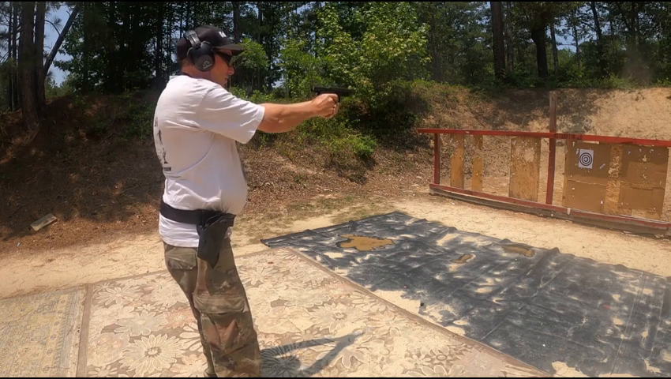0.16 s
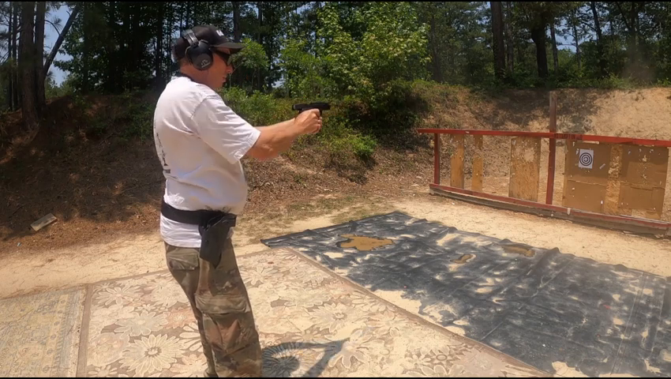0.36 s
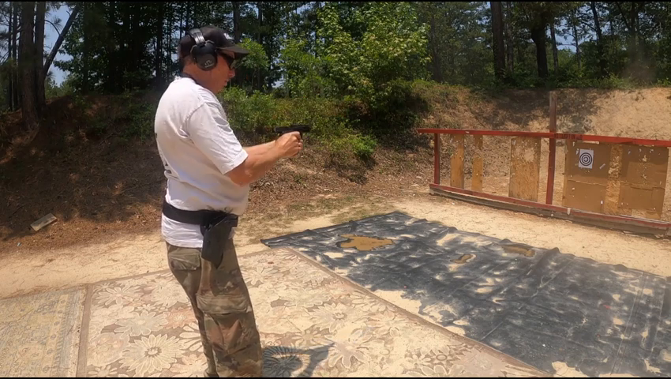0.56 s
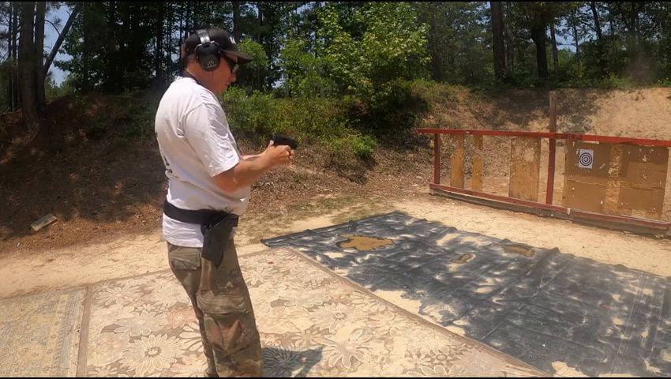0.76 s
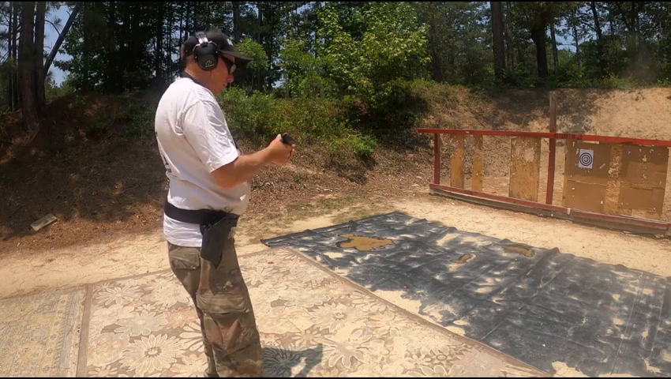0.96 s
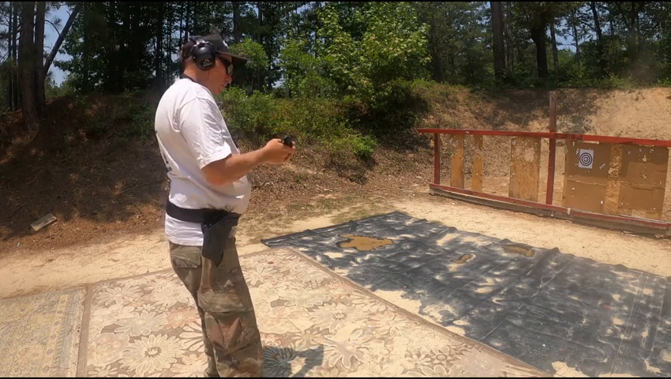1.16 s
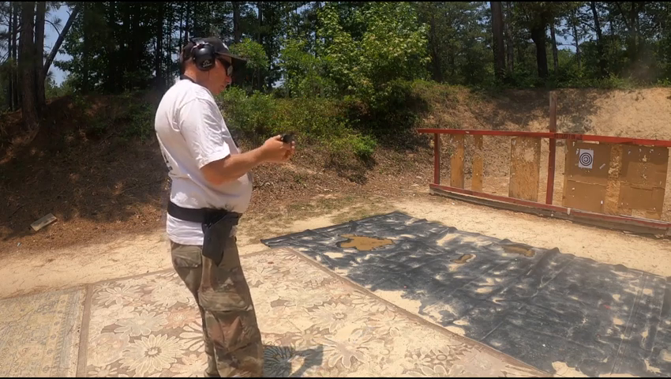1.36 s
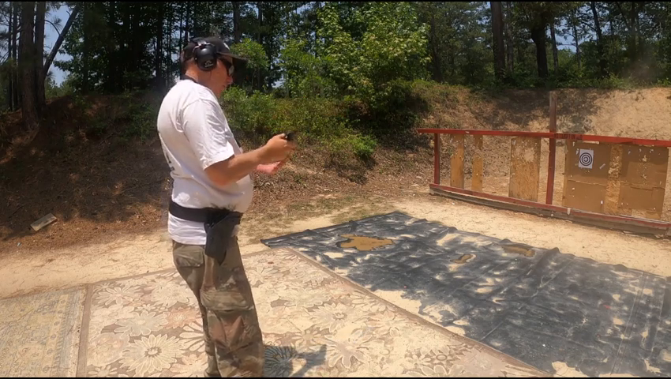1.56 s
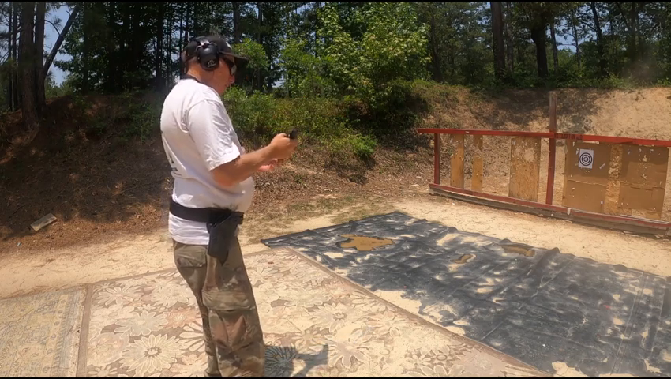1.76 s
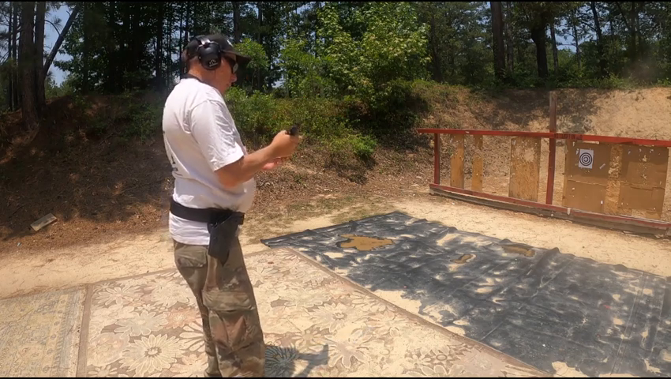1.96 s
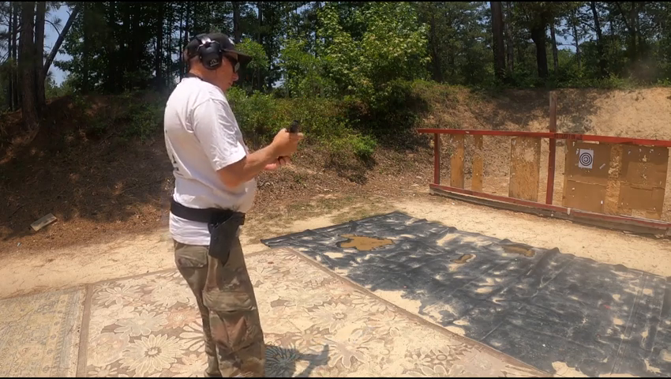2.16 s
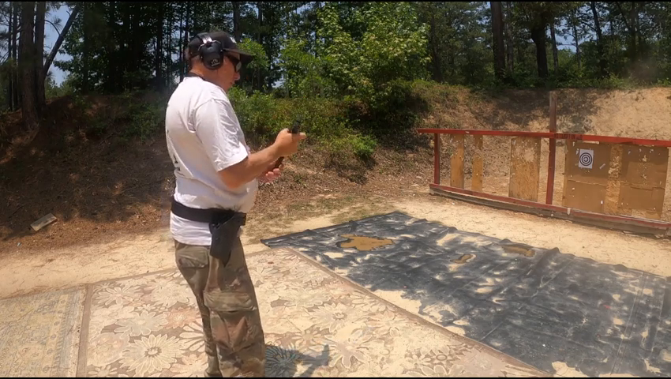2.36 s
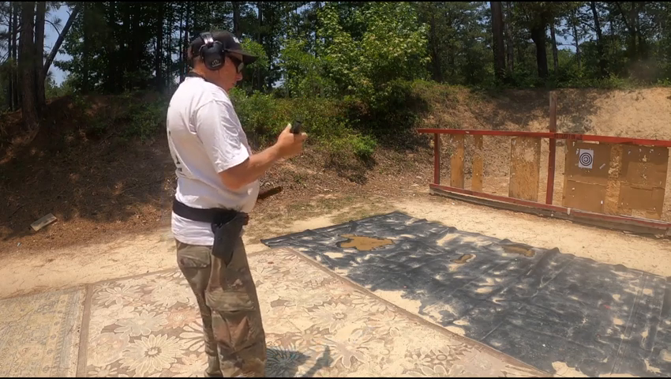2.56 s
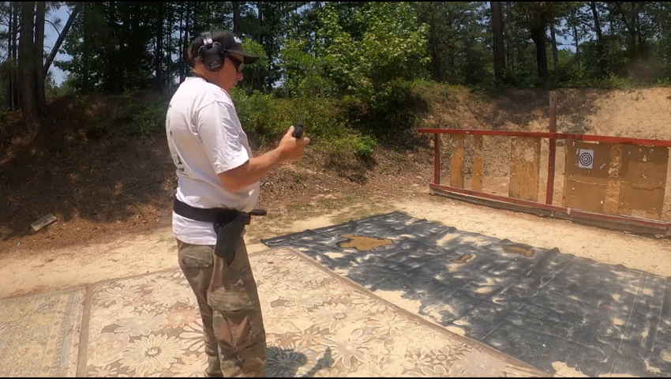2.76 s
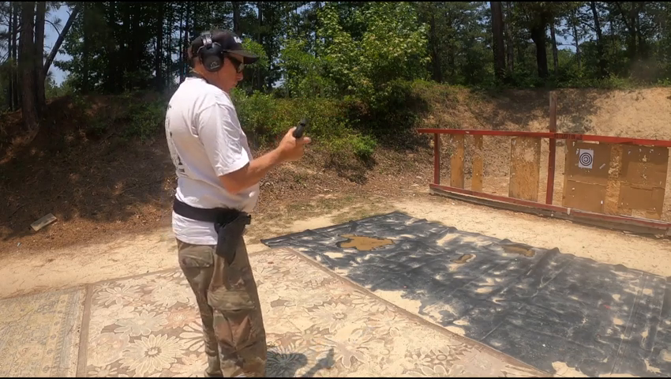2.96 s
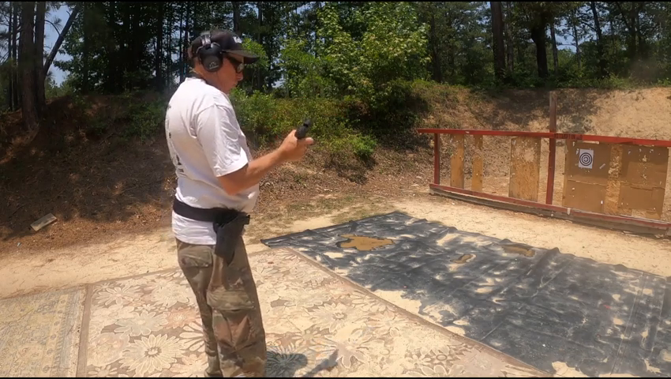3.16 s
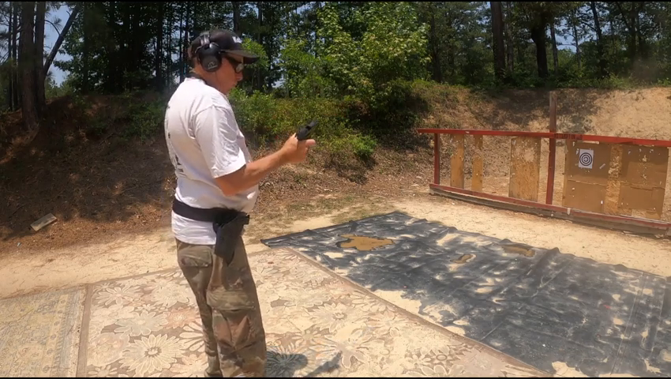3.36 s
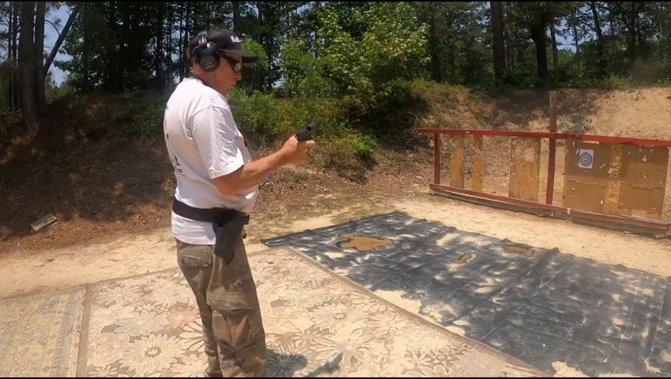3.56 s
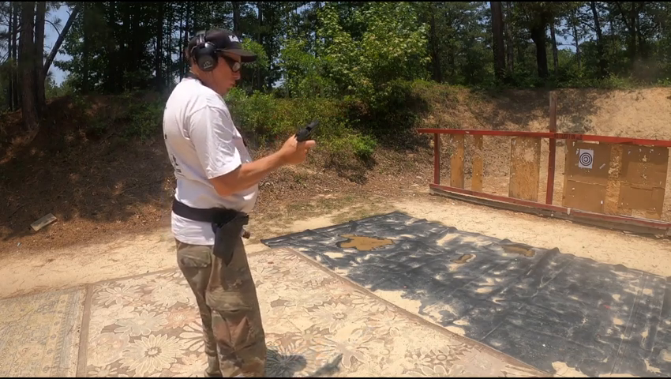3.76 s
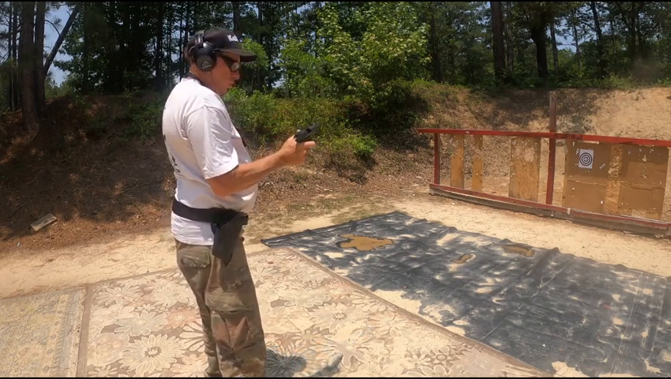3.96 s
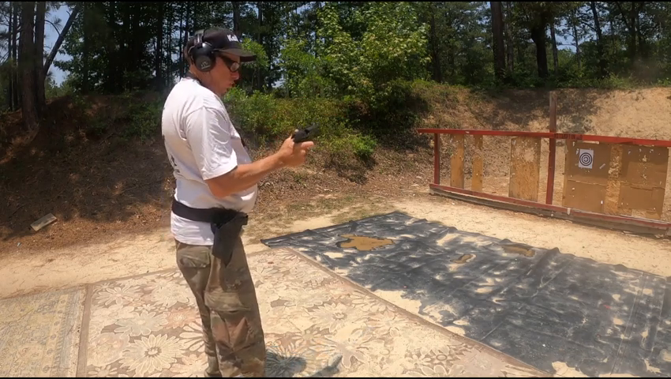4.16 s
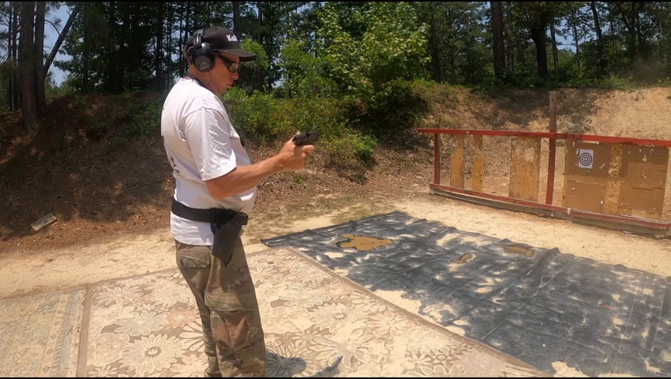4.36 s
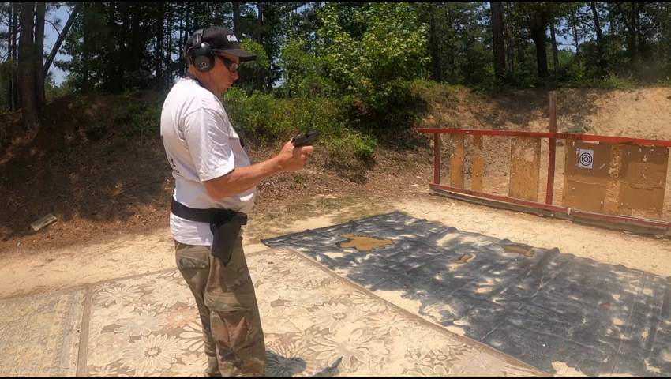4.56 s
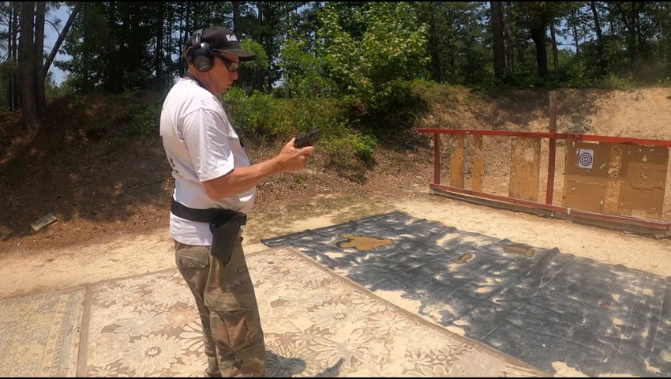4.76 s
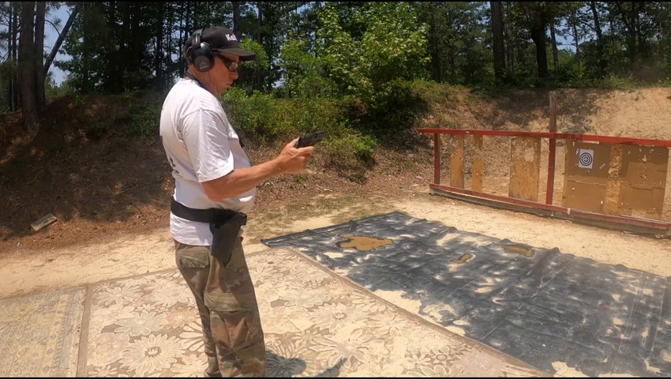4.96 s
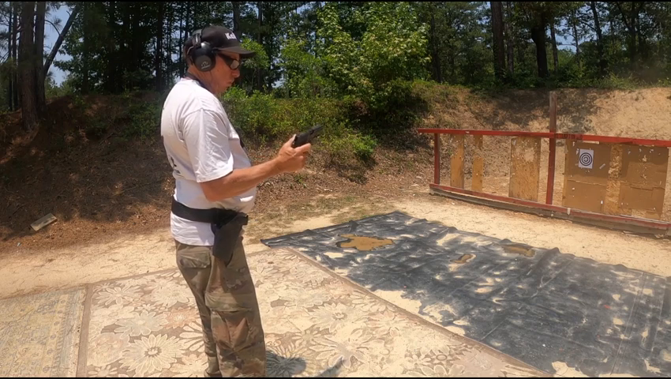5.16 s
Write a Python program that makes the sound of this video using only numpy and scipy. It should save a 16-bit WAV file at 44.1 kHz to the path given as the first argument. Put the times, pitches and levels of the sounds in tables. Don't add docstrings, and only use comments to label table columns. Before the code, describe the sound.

A pistol shot's echo rolls away across a wooded outdoor range, then light steel clicks, a sliding magazine and a loud metallic slide snap.

```python
import sys
import numpy as np
from scipy import signal
from scipy.io import wavfile

SR = 44100
rng = np.random.default_rng(int(sys.argv[2]) if len(sys.argv) > 2 else 0)


def generate_wav(sig):
    pcm = np.round(np.clip(np.atleast_2d(sig).T, -1, 1) * 32767).astype(np.int16)
    wavfile.write(sys.argv[1], SR, pcm)


def magnitude_from_level(level_db):
    exponent = np.asarray(level_db, float) / 20
    return 10 ** exponent


N = 229981


def at_hz(points, hz):
    f, level = np.array(points)[:, 0], np.array(points)[:, 1]
    return np.interp(np.log(hz), np.log(f), level)


def rms_one(x):
    return x / np.sqrt(np.mean(x ** 2) + 1e-20)


def band_pass(x, edges, order):
    return signal.sosfilt(signal.butter(order, edges, "band", fs=SR, output="sos"), x)


def drift(rate):
    r = np.exp(-80 * np.pi * rate / SR)
    slow = signal.lfilter([1], [1, -2 * r, r * r], rng.standard_normal(N // 40 + 2002))[2000:]
    return np.interp(np.arange(N) / 40, np.arange(len(slow)), rms_one(slow))


def ring(clicks, hz, t60):
    r, w = magnitude_from_level(-60 / (t60 * SR)), 2 * np.pi * hz / SR
    return signal.lfilter([0, np.sin(w)], [1, -2 * r * np.cos(w), r * r], clicks + 1e-18)


def swell(rows, t):
    total = 0
    for start, attack, hold, db, fall in rows:
        climb_db = 15 * np.clip(1 - (t - start) / attack, 0, 1)
        fallen_db = fall * np.clip(t - start - attack - hold, 0, 9)
        total = total + (t > start) * magnitude_from_level(db - climb_db - fallen_db)
    return total


# f/Hz, side minus mid level/dB
AIR_WIDTH = [(30, -24), (240, -36), (950, -42), (3770, -26), (15000, -8)]


def noise_bands():
    edges = 22 * 2 ** np.arange(0, 9.7, 1 / 3)
    centres = np.sqrt(edges[1:] * edges[:-1])
    white, bands = rng.standard_normal((2, 2, N)), []
    for k, hz in enumerate(centres):
        mid, side = band_pass(white[k % 2], edges[k:k + 2], 3)
        bands.append(mid + magnitude_from_level(at_hz(AIR_WIDTH, hz)) * side * [[1], [-1]])
    return centres, bands


def coloured(bank, spectrum, patchy_db):
    return rms_one(sum(magnitude_from_level(at_hz(spectrum, hz) + patchy_db * drift(7)) * band for hz, band in zip(*bank)))


# f/Hz, level/dB per Hz
ROLL_SPECTRUM = [(25, -53), (100, -16.5), (250, -16), (500, -5), (900, -3.5), (1300, -5), (1800, -15),
                 (2800, -10), (5000, -17.5), (9000, -27.5), (15000, -54)]
# f/Hz, loss/dB per s
AIR_LOSS_RATE = [(30, 42.5), (100, 21), (250, -8.5), (700, 5), (2400, 22), (4000, 47.5), (6000, 62.5),
                 (10000, 107.5), (15000, 153)]


def shot_roll(bank):
    age, together = np.arange(N) / SR, drift(13)
    near_db = -29.5 - 83.5 * np.clip(age - 0.15, 0, 9)
    woods_db = -34 - 13 * age - 25 * np.clip(age - 2.3, 0, 9)
    gains = magnitude_from_level(at_hz(ROLL_SPECTRUM, bank[0]))
    gains = gains / np.sqrt(np.sum(gains ** 2 * bank[0]) / SR)
    roll = 0
    for gain, hz, band in zip(gains, *bank):
        loss = at_hz(AIR_LOSS_RATE, hz)
        near = magnitude_from_level(near_db - loss * 0.76 * age)
        woods = magnitude_from_level(woods_db - loss * 0.63 * (age + 0.09))
        flicker = magnitude_from_level(0.4 * together + 0.6 * drift(11))
        roll = roll + gain * np.hypot(near, woods) * flicker * band
    return magnitude_from_level(3.0) * roll


# t/s, peak level/dB, length/ms
BANK_SLAPS = [
    (.008, -17.5, 4.5),
    (0.014, -15, 0.88),
    (0.055, -20, 2.13),
    (0.058, -12, 3.5),
    (0.107, -18, 3.1),
    (0.131, -28, 2.6),
]


def slaps():
    out = np.zeros(N)
    for s, db, ms in BANK_SLAPS:
        i, n = round(s * SR), round(ms * SR / 1000)
        out[i:i + n] += magnitude_from_level(db) * np.linspace(1, -1, n)
    return band_pass(out, [220, 1900], 2)


# start t/s, attack/s, hold/s, level/dB, fall/dB per s
OPENING_BASS = [
    (-.01, 0.0067, 0.0012, -30.5, 671),
    (.06, 0.031, .002, -48, 337),
    (.15, 0.043, .002, -52, 805),
    (.2, 0.022, 0.22, -74.5, 58),
]


def opening_bass():
    low = band_pass(rng.standard_normal(N + SR), [18, 90], 2)[SR:]
    return swell(OPENING_BASS, np.arange(N) / SR) * rms_one(low)


# f/Hz, level/dB per Hz
RUMBLE_SPECTRUM = [(20, -13), (45, -12), (80, -6), (120, -7), (180, -2), (260, -14), (400, -19), (700, -24),
                   (1200, -34), (4000, -80)]
# f/Hz, level/dB per Hz
LEAF_SPECTRUM = [(250, -16), (600, -20), (1000, -15.5), (1500, -0.5), (2200, 0), (3200, -3.5), (5000, -8),
                 (7500, -10), (9500, -21.5), (11500, -24), (15500, -39)]


def surroundings(bank):
    t = np.arange(N) / SR
    rumble_db = -61 - 6 * np.clip(3.0 - t, 0, 9) - 30.5 * np.clip(1 - t, 0, 1)
    dip_db = 12 * np.clip(1 - abs(t - 2.76) / 0.12, 0, 1)
    hiss_db = -75 - 17.5 * np.clip(2.08 - t, 0, 9) - dip_db
    lumps_db = 0.73 * drift(1.9) + 0.48 * drift(9.9)
    rumble = magnitude_from_level(rumble_db + lumps_db) * coloured(bank, RUMBLE_SPECTRUM, patchy_db=2.0)
    return rumble + magnitude_from_level(hiss_db) * coloured(bank, LEAF_SPECTRUM, patchy_db=-0.16)


# f/Hz, level/dB, t60/s
STEEL_MODES = [(750, -6, .005), (1270, -3, .006), (1700, -2, .004), (2250, -2, .005), (2700, -3, .004),
               (3350, -3, .008), (3900, -4, .005), (4450, -1, .006), (5000, -3, .006), (5600, -5, .005),
               (6700, -6, .004), (7600, -2, .006), (9050, -6, .005), (10200, -11, .003), (11600, -13, .003),
               (13200, -16, .002), (14800, -19, .002)]


def contacts(table, octaves, t60_scale, dry_db, blow, order):
    out, t = np.zeros(N), np.arange(SR // 12) / SR
    for s, db, hz, ms in table:
        age = t * 1000 / max(ms, .1)
        rattle = rng.standard_normal(len(t)) * np.minimum(age * 3, 1) * np.exp(-age)
        rattle[round(ms * 8)] = blow
        rings = 0
        for k, (mode_hz, mode_db, t60) in enumerate(STEEL_MODES):
            level_chance, pitch_chance = rng.standard_normal(2)
            mode = ring(rattle, mode_hz * (1 + 0.0029 * pitch_chance), t60 * t60_scale)
            rings = rings + (-1) ** k * magnitude_from_level(mode_db + 3 * level_chance) * mode
        edges = np.clip(hz * 2. ** np.array([-octaves / 2, octaves / 2]), 300, 19000)
        hit = band_pass(rms_one(rings) + magnitude_from_level(dry_db) * rms_one(rattle), edges, order)
        i = round(s * SR)
        out[i:i + len(t)] += magnitude_from_level(db) * hit / np.abs(hit).max()
    return out


# t/s, peak level/dB, centre f/Hz, rattle/ms
PIN_TICKS = [
    (1.572, -81, 9730, 2.1),
    (1.628, -80, 10000, 5.),
    (1.651, -63, 5500, 1.5),
    (3.29, -72, 9760, 8.),
    (4.094, -50, 4700, 4.),
    (4.105, -63, 4800, 12),
    (4.121, -65, 4600, 9.2),
    (4.14, -70, 4570, 11.),
]


def pins():
    return contacts(PIN_TICKS, octaves=.18, t60_scale=0.5, dry_db=5, blow=2.3, order=3)


# delay t/s, attack/s, hold/s, level/dB, fall/dB per s
YARD_ECHO = [
    (.001, 0.003, 0.0024, -70, 261),
    (.03, .03, .005, -52, 101),
             (.027, .003, .002, -40, 3500),
]


def yard(x):
    t = np.arange(round(.4 * SR)) / SR
    echo = rng.standard_normal(len(t)) * swell(YARD_ECHO, t)
    echo = band_pass(echo, [1000, 12000], 1)
    stretch = np.minimum(t // .016, 13)
    out = 0
    for k in range(14):
        side_facing = x * np.sign(drift(600))
        out = out + signal.fftconvolve(side_facing, echo * (stretch == k))[:N]
    return out


# start t/s, length/s, from f/Hz, to f/Hz, level/dB
BIRD_NOTES = [(1.62, .04, 3350, 3380, -83), (1.635, .075, 3000, 2880, -74), (1.70, .11, 3000, 3150, -75),
              (1.74, .08, 2700, 2550, -77), (1.80, .06, 2650, 3500, -76), (1.86, .14, 3200, 3050, -77),
              (1.85, .2, 3600, 3480, -75), (1.825, .04, 6800, 4800, -81), (2.025, .045, 4750, 5350, -79),
              (2.075, .043, 7300, 4550, -72), (2.075, .055, 6000, 5750, -80)]


def bird():
    out, t = np.zeros(N), np.arange(N) / SR
    rough = np.clip(.1 + 2.95 * (t - 1.62), 0, .7)
    for s, length, from_hz, to_hz, db in BIRD_NOTES:
        along = np.clip((t - s) / length, 0, 1)
        level_db = db + np.interp(along, [0, .35, 1], [-6, 0, -5])
        edge = np.clip(np.minimum(t - s, s + length - t) / 0.0044, 0, 1)
        glide_hz = from_hz + (to_hz - from_hz) * along
        phase = 2 * np.pi * np.cumsum(glide_hz * (1 + 0.0275 * rough * drift(180.0))) / SR
        flutter = 1 - 0.71 * rough + rough * drift(200)
        out += edge * magnitude_from_level(level_db + 8) * flutter * np.sin(phase)
    echo_t = np.arange(SR // 3) / SR
    trees = rng.standard_normal(SR // 3) * magnitude_from_level(-35 - 110 * echo_t)
    return out + signal.fftconvolve(out, trees)[:N]


# f/Hz, level/dB per Hz
SLOPE_SPECTRUM = [(500, -23), (800, -2), (1200, 7.5), (1700, -3.5), (2400, -3), (3400, -14.5), (5000, -30),
                  (8000, -37)]
# start t/s, attack/s, hold/s, level/dB, fall/dB per s
SLOPE_RETURN = [
    (1.75, 0.088, 0.56, -74, 36),
    (2.76, 0.16, 0.078, -60.5, 26.5),
    (2.9, 0.22, 0.2, -72, 5),
]


def far_slope(bank):
    noise = coloured(bank, SLOPE_SPECTRUM, patchy_db=3.0)
    return swell(SLOPE_RETURN, np.arange(N) / SR) * np.roll(noise, SR, axis=1)


def scrape(strokes, modes, rasp_db):
    sizes_db = 2.2 * np.minimum(rng.exponential(1, N), 3) + .8 * drift(90)
    slips = magnitude_from_level(sizes_db) * rng.choice([-1, 1], N)
    slips = slips * (rng.random(N) < 9000 / SR)
    rings = 0
    for k, (hz, width, db) in enumerate(modes):
        rings = rings + (-1) ** k * magnitude_from_level(db) * rms_one(ring(slips, hz, 2.2 / width))
    rasp = band_pass(slips, [1200, 7000], 2)
    sound = rms_one(rms_one(rings) + magnitude_from_level(rasp_db) * rms_one(rasp))
    return swell(strokes, np.arange(N) / SR) * sound


# t/s, peak level/dB, centre f/Hz, rattle/ms
MAGAZINE_CLICKS = [(2.2925, -48, 2200, 1), (2.296, -40, 930, 1.04), (2.2995, -37.5, 4200, 3.1),
                   (2.3098, -31, 5400, 3.2), (2.330, -49, 3100, 2.5), (2.344, -28, 2040, 0.4),
                   (2.3465, -36, 1890, 3.4), (2.357, -56, 2500, 1.7), (2.3755, -37.5, 1900, 3.7),
                   (2.449, -46.5, 1890, 2.58), (2.5125, -40, 4000, 3.9), (2.641, -41, 3020, 3.4),
                   (2.6595, -32.5, 2020, 1.3), (2.6655, -42.5, 1330, 3.4)]
# start t/s, attack/s, hold/s, level/dB, fall/dB per s
MAGAZINE_STROKES = [
    (2.29, 0.011, 0.014, -47.5, 208),
    (2.33, 0.0092, 0.016, -71, 274),
    (2.508, 0.038, 0.021, -45, 213),
    (2.585, 0.013, 0.0035, -50, 330),
    (2.63, 0.011, 0.026, -56, 450),
]
# f/Hz, width/Hz, level/dB
WELL_MODES = [(1280, 120, -9), (1900, 300, -10), (2350, 260, -1), (2850, 260, -6), (3340, 70, -1),
              (4300, 200, -6), (5750, 250, -11), (7600, 250, -16), (9000, 400, -22)]


def magazine():
    clicks = contacts(MAGAZINE_CLICKS, octaves=1.3, t60_scale=0.73, dry_db=1.6, blow=4.1, order=2)
    return clicks + magnitude_from_level(1.5) * scrape(MAGAZINE_STROKES, WELL_MODES, rasp_db=-9.0)


# t/s, peak level/dB, centre f/Hz, rattle/ms
CATCH_TICKS = [
    (3.349, -59, 5500, 3.),
    (3.914, -49, 4500, 1.8),
    (3.919, -51, 6000, 1.8),
    (3.944, -66, 6500, 4.),
    (4.042, -68, 6000, 12.),
    (4.053, -61, 2400, 2.5),
    (4.067, -35, 4800, 1.1),
    (4.0695, -30, 4000, 1.1),
    (4.074, -38, 3000, 1.6),
]


def catches():
    return contacts(CATCH_TICKS, octaves=1.7, t60_scale=0.68, dry_db=-1.3, blow=1.7, order=2)


# t/s, peak level/dB, centre f/Hz, rattle/ms
SLIDE_HITS = [
    (5.0178, -16, 2600, 1.1),
    (5.0185, -34, 700, 2.5),
    (5.0218, -12, 3600, .9),
    (5.0268, -17, 3600, 1.1),
    (5.0348, -22, 3000, 1.3),
    (5.0397, -1, 3800, .6),
    (5.040, -25, 1100, 3.5),
]
# t/s, peak level/dB, centre f/Hz, rattle/ms
SPRING_HITS = [
    (5.029, -26, 7360, 2.3),
    (5.0345, -17, 7560, 2.3),
    (5.038, -22, 7200, 0.3),
]
# start t/s, attack/s, hold/s, level/dB, fall/dB per s
RAIL_STROKES = [
    (4.99, 0.02, 0.0033, -49, 300),
    (5.019, 0.0158, .004, -22, 704),
]
# f/Hz, width/Hz, level/dB
RAIL_MODES = [(1460, 510, -4.5), (3090, 1400, 3), (4200, 2400, -9.5), (5000, 310, 0), (7510, 680, -3.5),
              (9160, 850, -2)]


def slide_snap():
    bounces = [(5.0428 + .0044 * k, -7 - 7 * k, 4500, .8) for k in range(3)]
    hits = contacts(SLIDE_HITS + bounces, octaves=.8, t60_scale=0.71, dry_db=0.99, blow=6.5, order=1)
    spring = contacts(SPRING_HITS, octaves=.18, t60_scale=0.73, dry_db=1.4, blow=3.4, order=2)
    return hits + spring + scrape(RAIL_STROKES, RAIL_MODES, rasp_db=-2.6)


def low_thump():
    push = np.clip(np.arange(N) / SR - 5.036, 0, 1) / 0.0036
    return magnitude_from_level(-23.0) * push * (1 - push / 2) * np.exp(-push)


def scene():
    bank = noise_bands()
    shot = shot_roll(bank) + slaps() + opening_bass()
    handling = pins() + magazine() + catches()
    snap = slide_snap()
    pistol = handling + snap + yard(snap + magnitude_from_level(-6.5) * handling)
    treble = signal.sosfiltfilt(signal.butter(2, 11500, "high", fs=SR, output="sos"), pistol)
    apart = magnitude_from_level(-7) * treble + magnitude_from_level(-19) * np.gradient(pistol)
    air = surroundings(bank) + far_slope(bank) + bird()
    return shot + low_thump() + air + pistol + apart * [[-1], [1]]


def roll_off(x):
    return signal.sosfilt(signal.butter(12, 15780, fs=SR, output="sos"), x)


# f/Hz, width/Hz, boost level/dB
HOUSING_MODES = [(7500, 700, 2.5), (8350, 450, -6), (9200, 800, 4)]


def record(dry):
    for hz, width, boost_db in HOUSING_MODES:
        r = np.exp(-np.pi * width / SR)
        poles = [1, -2 * r * np.cos(2 * np.pi * hz / SR), r * r]
        band = signal.lfilter((1 - r * r) / 2 * np.array([1, 0, -1]), poles, dry)
        dry = dry + (magnitude_from_level(boost_db) - 1) * band
    held = np.clip(dry, -.83, .83)
    mix = signal.sosfilt(signal.cheby2(10, 60, 16200, fs=SR, output="sos"), held)
    return roll_off(mix)


dry = scene()
out = record(dry)
generate_wav(out)
```